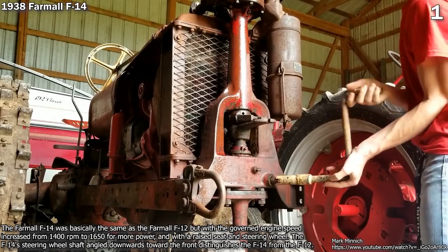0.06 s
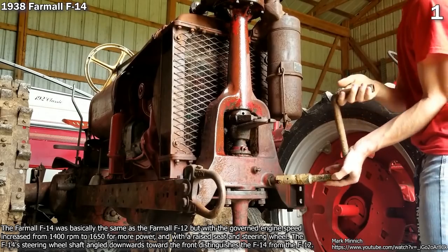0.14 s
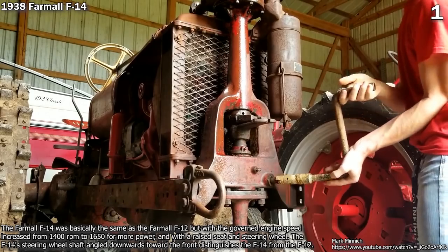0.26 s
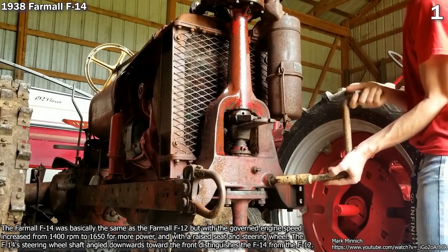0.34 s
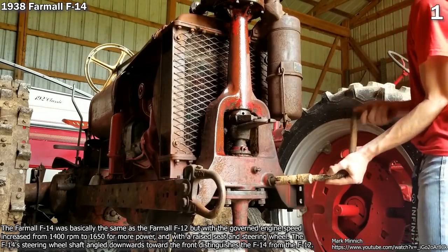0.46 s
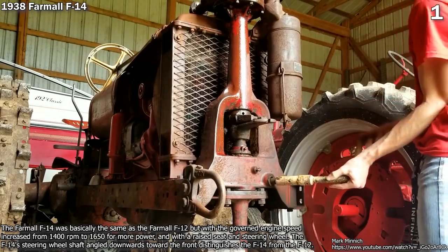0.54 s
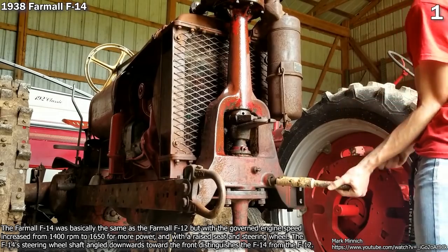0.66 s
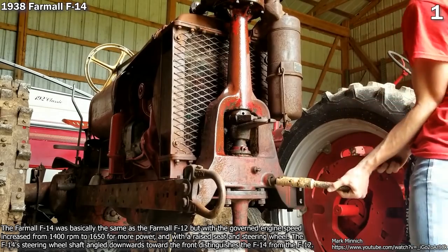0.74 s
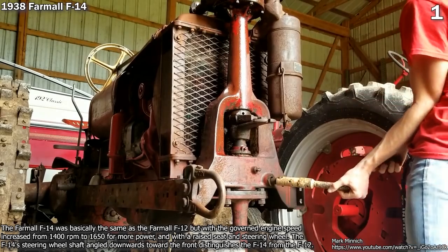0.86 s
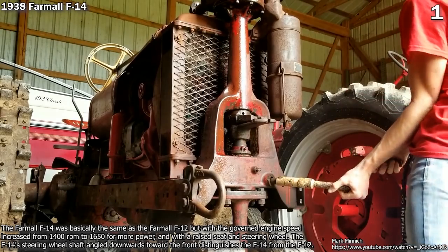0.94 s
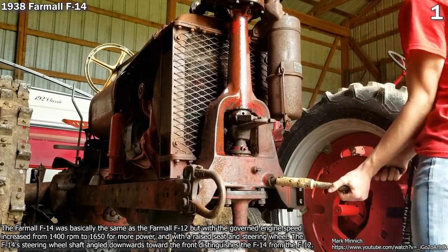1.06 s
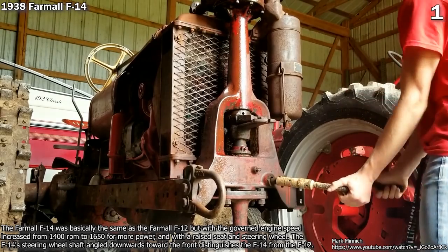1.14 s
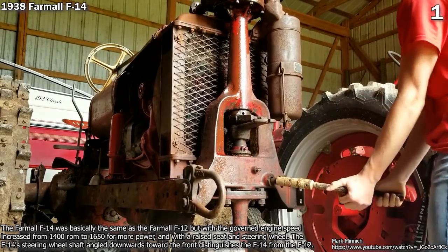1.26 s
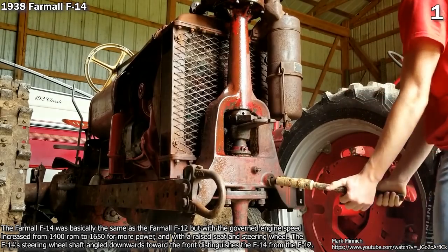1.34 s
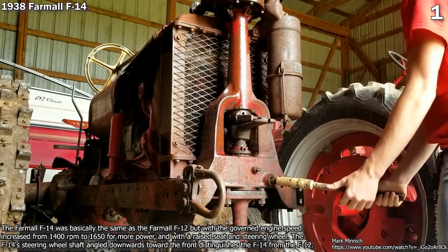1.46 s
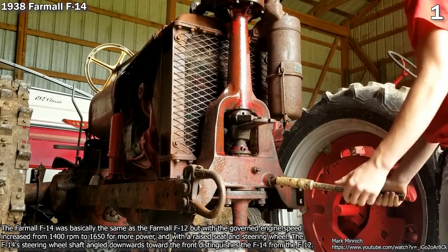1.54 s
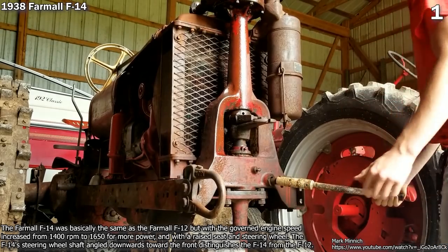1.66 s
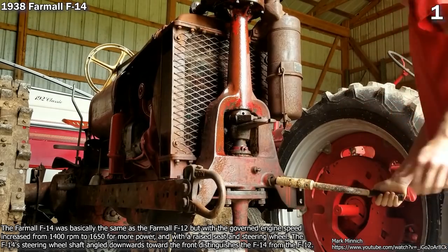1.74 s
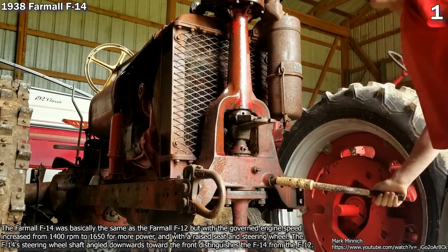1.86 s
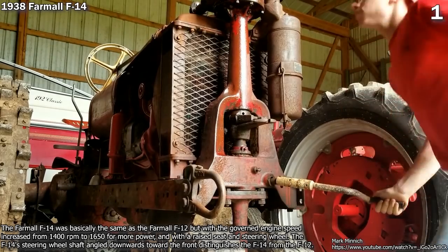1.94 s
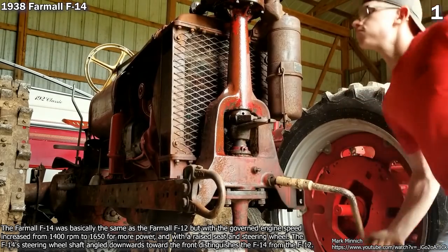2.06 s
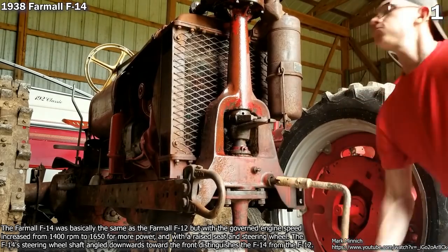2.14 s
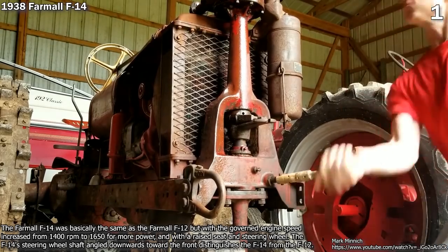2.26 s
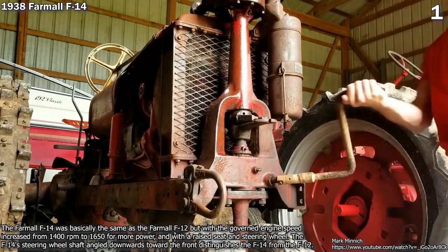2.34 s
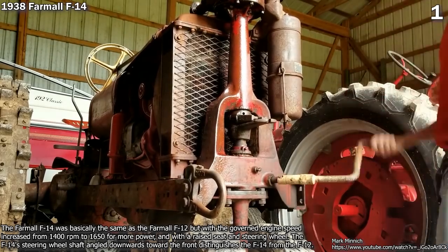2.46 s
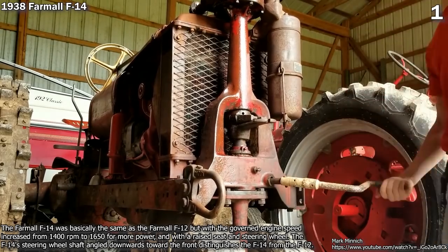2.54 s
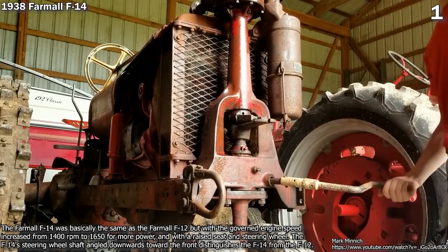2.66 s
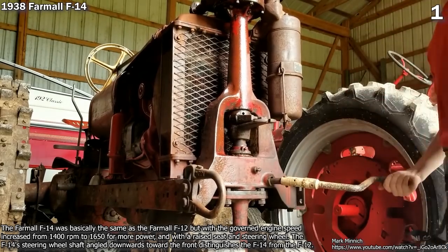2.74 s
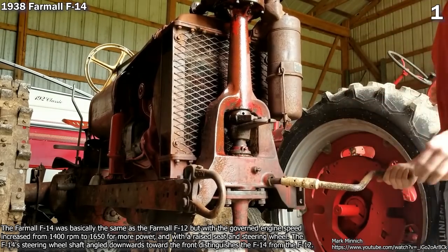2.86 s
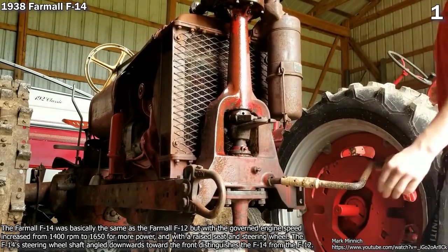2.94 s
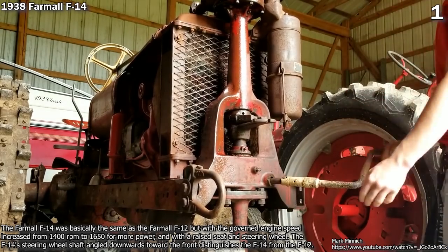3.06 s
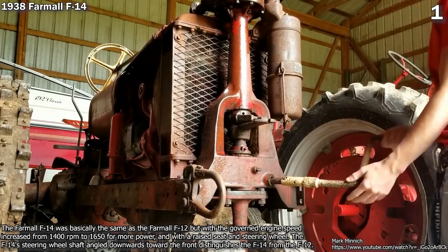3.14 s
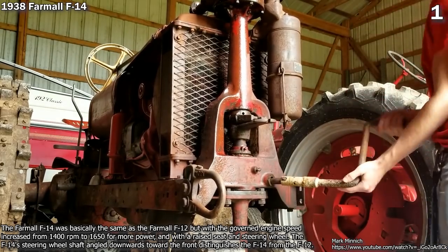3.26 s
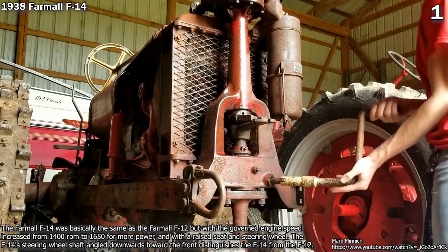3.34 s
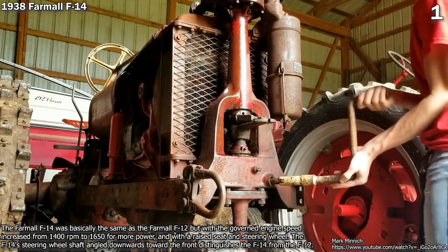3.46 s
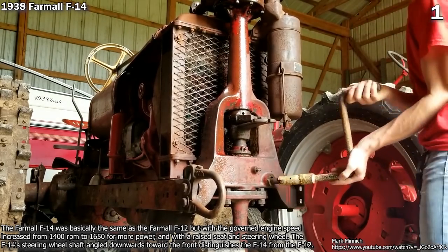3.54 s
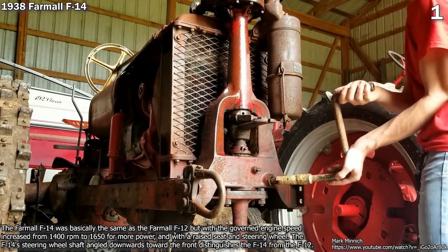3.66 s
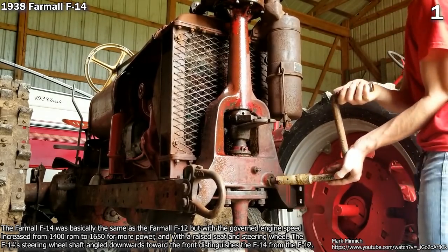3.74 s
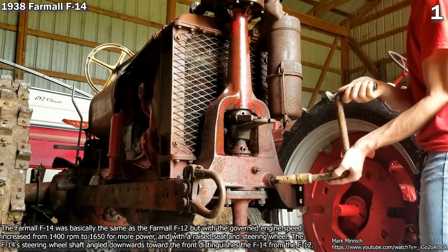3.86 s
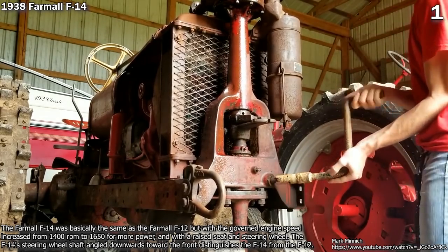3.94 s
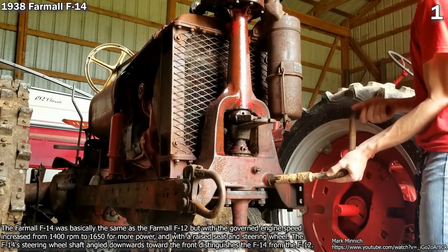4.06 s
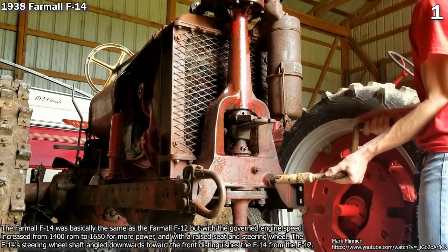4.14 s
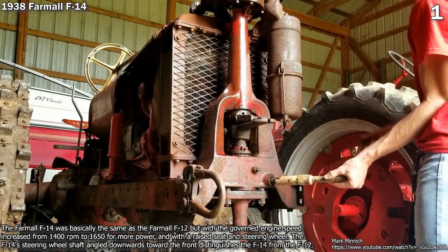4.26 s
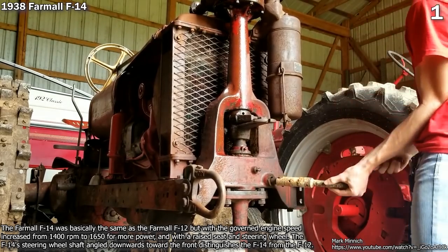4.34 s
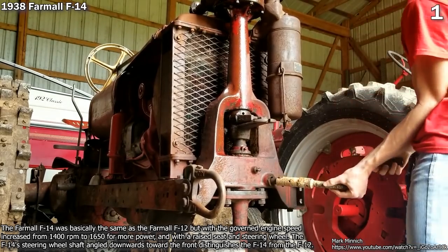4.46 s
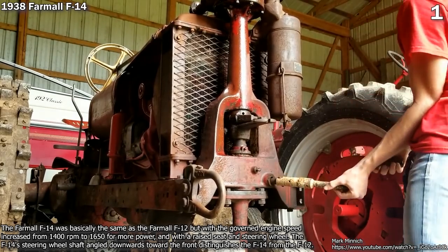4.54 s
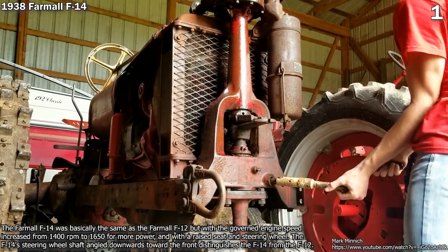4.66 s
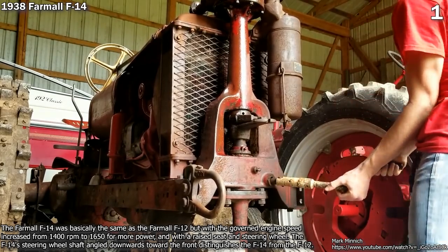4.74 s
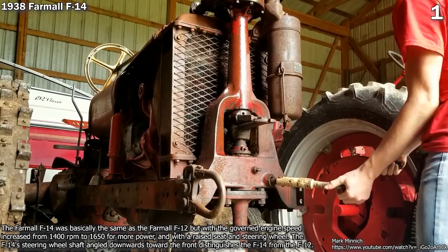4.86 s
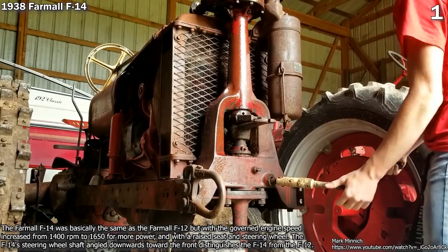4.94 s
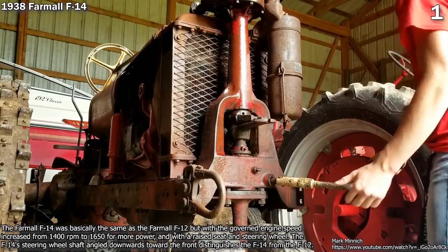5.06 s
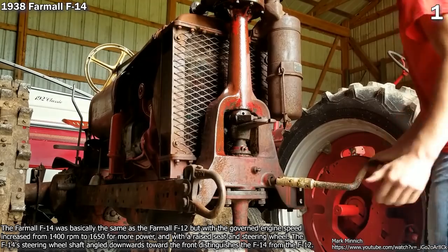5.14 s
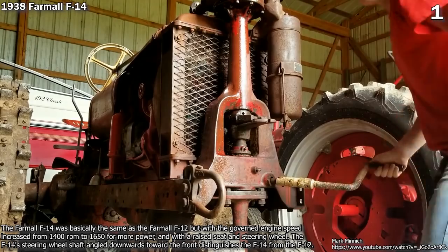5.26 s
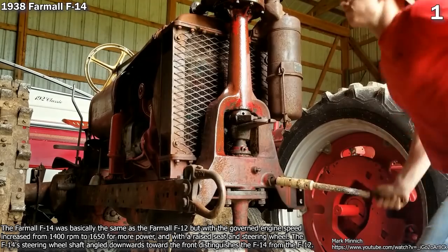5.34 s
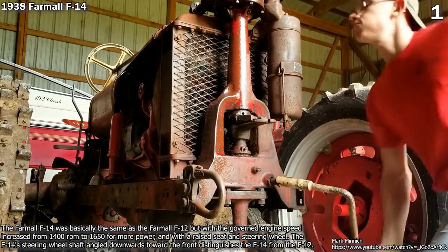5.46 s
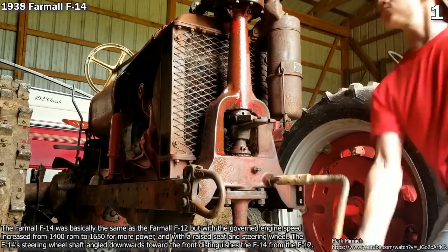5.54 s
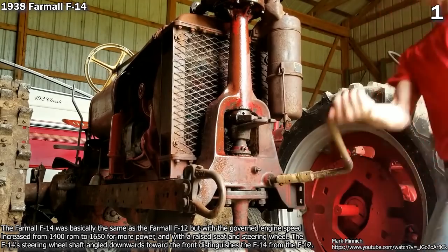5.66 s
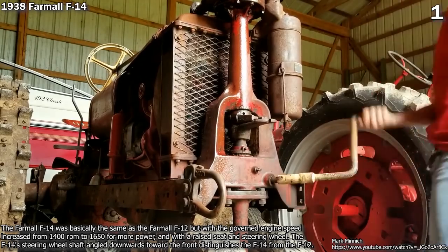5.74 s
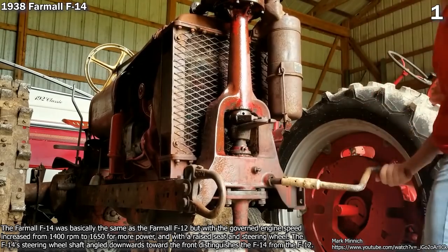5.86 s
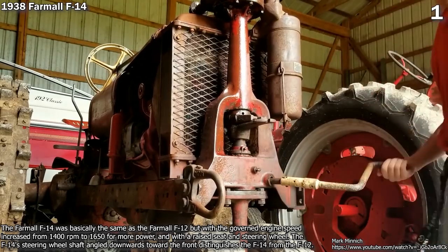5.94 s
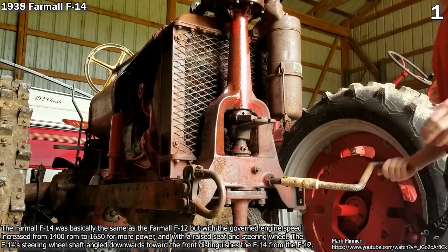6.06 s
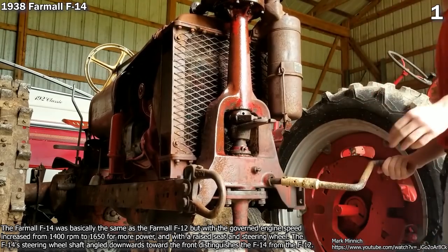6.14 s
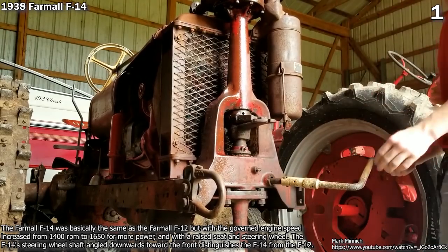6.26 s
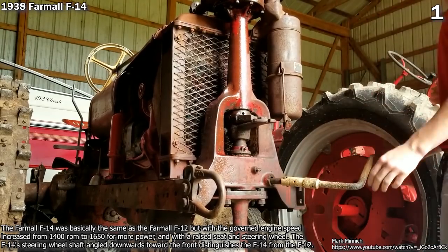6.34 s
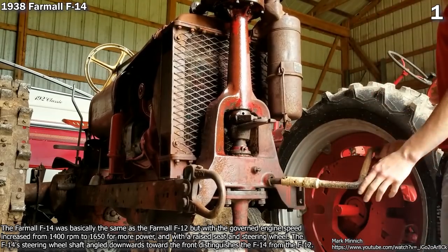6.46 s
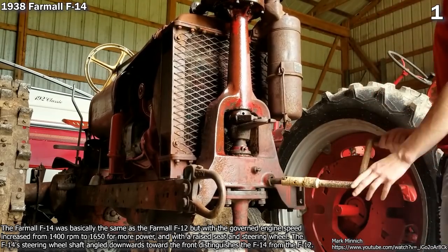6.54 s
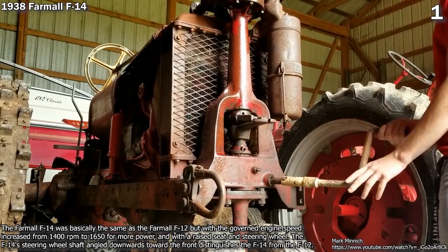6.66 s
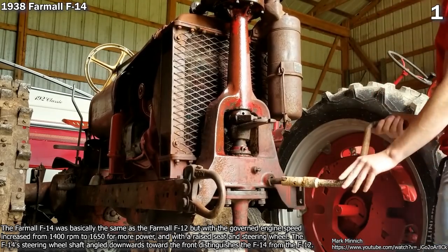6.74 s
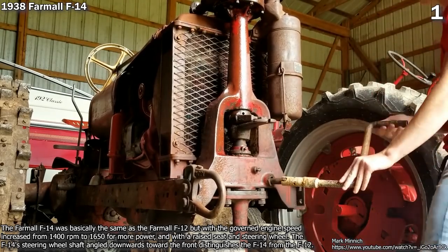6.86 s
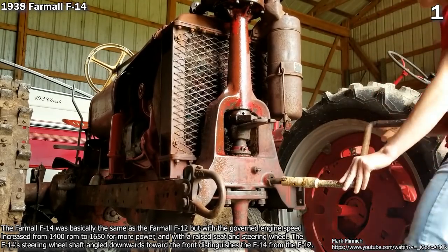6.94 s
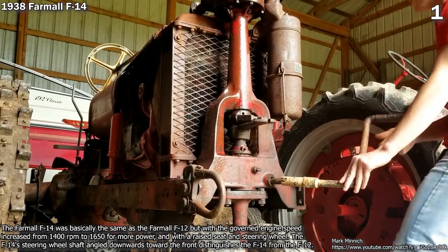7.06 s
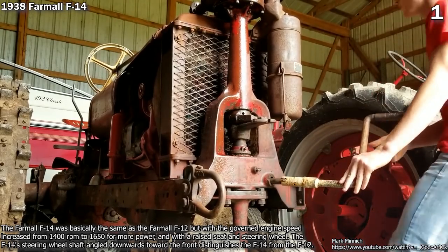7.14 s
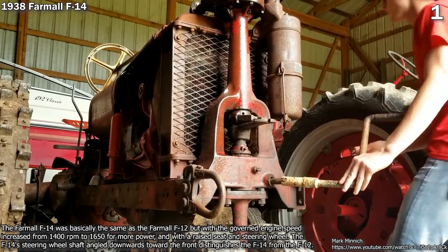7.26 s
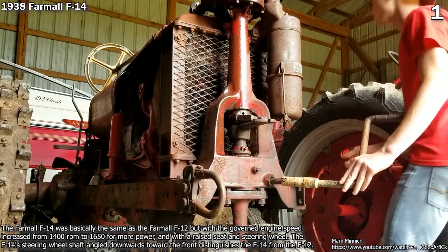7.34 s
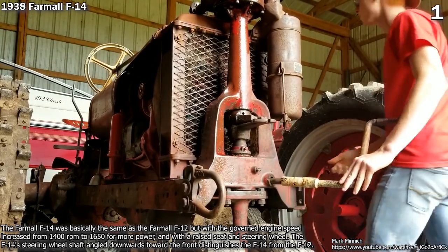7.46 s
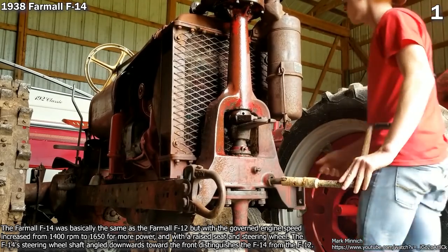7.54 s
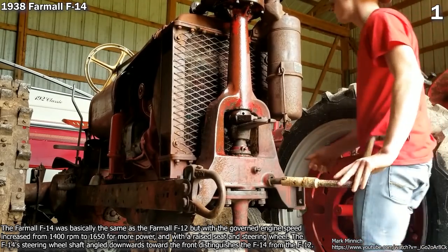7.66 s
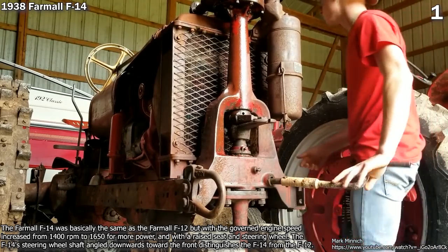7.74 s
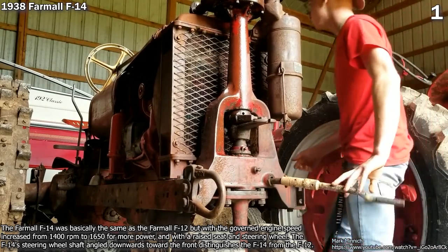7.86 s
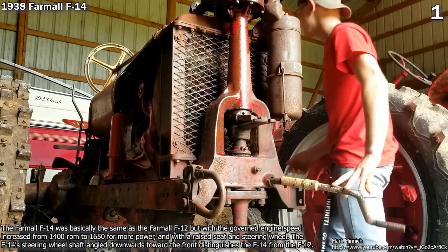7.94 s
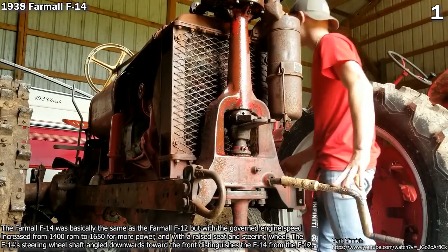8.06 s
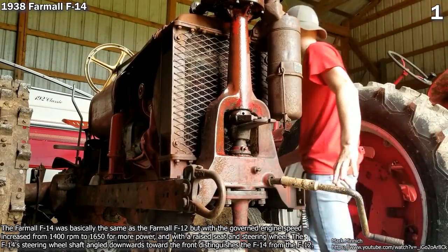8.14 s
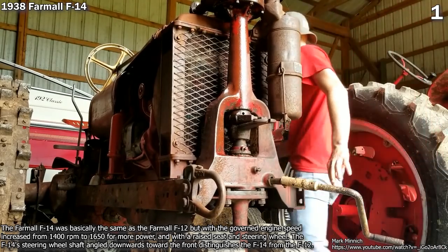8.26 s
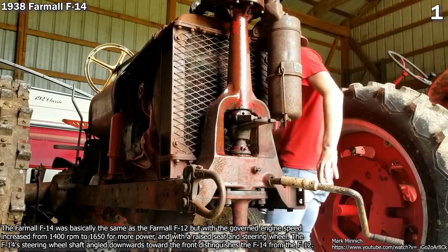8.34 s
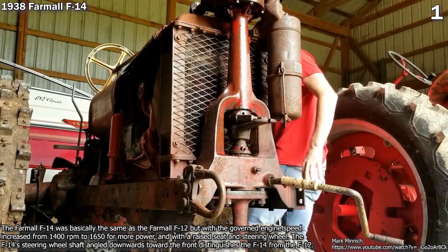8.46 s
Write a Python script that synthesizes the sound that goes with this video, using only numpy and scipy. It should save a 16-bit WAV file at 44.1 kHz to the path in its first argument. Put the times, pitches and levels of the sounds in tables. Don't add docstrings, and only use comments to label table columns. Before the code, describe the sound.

Inside a metal barn, an old iron engine is hand-cranked in two bursts of loud clacks and grinding gears, with soft handle knocks between.

```python
import sys
import numpy as np
from scipy import signal
from scipy.fft import rfft, irfft, next_fast_len
from scipy.io import wavfile
from scipy.ndimage import uniform_filter1d, map_coordinates

SR = 44100
rng = np.random.default_rng(int(sys.argv[2]) if len(sys.argv) > 2 else 0)


def invert_db(x):
    u = np.asarray(x, float) / 20
    return 10 ** u


def log_audio(samples):
    frames = np.atleast_2d(samples).T
    limited = np.clip(frames, -1, 1)
    pcm = np.round(limited * 32767).astype(np.int16)
    wavfile.write(sys.argv[1], SR, pcm)


N = 374844
SPAN, BINS = 49152, 18000


def unit(x):
    return x / np.sqrt(np.mean(x ** 2) + 1e-20)


def along(points, hz):
    f, v = np.transpose(points)
    return np.interp(np.log(hz + 1), np.log(f + 1), v)


def curves(rows):
    s, *cols = np.transpose(rows)
    return [np.interp(np.arange(N) / SR, s, c) for c in cols]


def wobble(rate):
    knots = rng.standard_normal(int(N * rate / SR) + 4)
    return map_coordinates(knots, [np.arange(N) * rate / SR])


def filtered(x, response):
    m = next_fast_len(N + SR)
    return irfft(rfft(x, m) * response(np.fft.rfftfreq(m, 1 / SR)), m)[..., :N]


def kind(events, shape):
    return [(*row, *shape) for row in events]


# (frequency [Hz], left-right likeness [1])
LIKENESS = [(30, 0.27), (120, 0.91), (300, 0.8), (1000, 0.14), (4000, 0.03)]
# (frequency [Hz], left over right [dB])
LEFT_LEAN = [(60, -3), (180, 4), (550, 5), (1650, 6.5), (4970, 3), (15000, 8)]


def rush(spectrum):
    m = next_fast_len(N)
    hz = np.fft.rfftfreq(m, 1 / SR)
    turn = np.arccos(np.clip(along(LIKENESS, hz), -1, 1)) / 2
    noise = rfft(rng.standard_normal((2, N)), m)
    mid, side = noise * invert_db(along(spectrum, hz)) * [np.cos(turn), np.sin(turn)]
    lean = invert_db(along(LEFT_LEAN, hz) * np.array([[.5], [-.5]]))
    pair = irfft(np.array([mid + side, mid - side]) * lean, m)[:, :N]
    return pair / np.sqrt(np.mean(np.mean(pair, axis=0) ** 2))


def peak(f, hz, width):
    return 1j * f * width / (hz * hz - f * f + 1j * f * width)


# (frequency [Hz], t60 [s])
BARN_T60 = [(200, 2), (700, 1.264), (3000, 0.86), (8000, 0.64), (14000, 0.42)]


def barn(early_db, early_t60):
    hz, t, z = signal.stft(rng.standard_normal((2, SR)), SR, nperseg=256)
    late = invert_db(-60 * t / along(BARN_T60, hz)[:, None])
    early = invert_db(early_db - 60 * t / early_t60)
    turn = np.arccos(np.clip(along(LIKENESS, hz), -1, 1))[:, None] / 2
    pair = np.cos(turn) * z[0] + np.sin(turn) * np.array([z[1], -z[1]])
    build_up = np.clip(t / 0.0021, 0, 1)
    tail = signal.istft(pair * (late + early) * build_up, SR, nperseg=256)[1]
    return rfft(tail / np.linalg.norm(tail[0]), SPAN)[:, :BINS]


def iron(events, parts, bands, halls, ring_db, trims_db, rough_db, rise, dip, wettest_db=5):
    f, t = np.fft.rfftfreq(SPAN, 1 / SR)[:BINS], np.arange(SR // 7) / SR
    modes = []
    for part in parts:
        modes.append(np.array([(-1) ** k * invert_db(db + ring_db) * peak(f, hz, width)
                               for k, (hz, width, db) in enumerate(part)]))
    beds = []
    for low, high in bands:
        middle, width = np.sqrt(low * high), high - low
        beds.append(peak(f, middle, width) ** 2 * peak(f, middle, 1.29 * width))
    hollow = (1 - np.clip(dip, 0, 1) * peak(f, 7800, 1700)) ** 2
    lean = invert_db(along(LEFT_LEAN, f) * np.array([[.5], [-.5]])) * hollow
    lag = np.exp(-2j * np.pi * f * np.array([[9e-5], [0]]))
    apart = 0.84 * f / (f + 500) * np.array([[1], [-1]])
    out = np.zeros((2, N + SPAN))
    for k, (s, db, boom_db, tick_db, contact, barn_db) in enumerate(events):
        onset = rise + .15 * contact
        decay = np.exp(-(t / np.clip(contact, .002, .09)) ** 1.4)
        push = np.clip(t / onset, 0, 1) ** 2 * decay
        chance = rng.standard_normal((3, len(t)))
        contacts = unit(invert_db(rough_db * unit(uniform_filter1d(chance[2], size=20))))
        shared, own = rfft(push * contacts * chance[:2], SPAN)[:, :BINS]
        whole = np.linalg.norm(push) * np.exp(-1j * np.pi * f * contact)
        levels = invert_db(db + np.array([boom_db, 0, tick_db]) + trims_db)
        bed = levels @ beds
        ring = sum(g * invert_db(rng.normal(0, 3, len(m))) @ m for g, m in zip(levels, modes))
        direct = (bed + ring) * (shared + apart * own) * lag
        hall_feed = (bed + 0.42 * ring) * (0.83 * whole + 0.49 * shared)
        far = invert_db(min(barn_db, wettest_db)) * hall_feed * halls[k % len(halls)]
        at = max(round((s - .7 * onset) * SR), 0)
        out[:, at:at + SPAN] += irfft(lean * (direct + far), SPAN)
    return out[:, :N]


# (frequency [Hz], density [dB per Hz])
AIR_SPECTRUM = [(120, -34), (200, -6), (227, -18), (382, -32), (3030, -24), (3380, -26), (5910, -31),
                (7330, -27), (14800, -27)]


def still_air():
    return invert_db(-72.0) * rush(AIR_SPECTRUM)


# (time [s], level [dB])
DRONE_LEVEL = [(0.0, -50), (0.59, -55.5), (1.23, -57), (2.0, -59), (2.22, -52), (2.56, -55), (2.74, -68.5),
               (2.95, -55.5), (3.41, -65), (3.72, -54.5), (4.02, -60), (4.69, -57.5), (5.1, -59.5),
               (5.66, -48), (6.25, -61.5), (7.05, -64.5), (8.24, -54), (8.5, -56)]
# (frequency [Hz], density [dB per Hz])
RUMBLE_SPECTRUM = [(13, -54.5), (22, -11), (59, -10.5), (86, -3), (122, -5), (173, -13.5), (236, -16),
                   (320, -32.5), (420, -62), (700, -120)]


def drone():
    turn = 2 * np.pi * np.cumsum(33.5 * (1 + 0.082 * wobble(0.99))) / SR
    second = invert_db(2.7 * wobble(6.2)) * np.sin(2 * turn)
    third = invert_db(-5.5 + 3.2 * wobble(9)) * np.sin(3 * turn)
    near_db, = curves([(0, 1), (1.5, 7.5), (3, -5), (8.5, -1.5)])
    rumble = rush(RUMBLE_SPECTRUM) * invert_db(0.61 * wobble(3.1))
    return invert_db(curves(DRONE_LEVEL)[0] - 2.0) * (rumble + invert_db(near_db) * (second + third))


# (time [s], peak [dB], casting boom [dB], bright tick [dB])
HANDLE_KNOCKS = [(.004, -49, 15, -9), (0.0242, -41, 9, -34), (0.054, -40, 2, -27), (0.1374, -33, 3, -2.5),
                 (3.191, -32, -2, -16), (3.267, -37, -3, -23), (3.3361, -52, 10.5, 10),
                 (4.389, -38, -1.5, -36), (6.561, -35, 6.5, -12), (7.0294, -55, 7, -15),
                 (7.2776, -48.5, 4, -4), (7.9413, -56.5, 10, 4.5), (8.329, -34, -3.5, -15)]
HIDDEN_KNOCKS = [(0.124, -47.5, 14, -14), (0.3192, -40, 5.5, -11), (0.3844, -70, 21, -13),
                 (1.1074, -50.5, 10.5, -30), (1.1482, -55.5, 19, -25), (1.1822, -42, -6.5, -11.5),
                 (3.3648, -42, 7, -30), (3.3877, -38, -9, -15), (3.4292, -46, 16.5, -8),
                 (4.0976, -36.5, -7, -8.5), (4.1814, -38, -7.5, -6), (4.7616, -50, -1, -6),
                 (6.3854, -30.5, -32.5, -3), (6.8714, -49, 3, -7), (6.9094, -50.5, 2.5, -7),
                 (7.006, -45.5, 1, -15), (7.3107, -50.5, 13.5, -10), (7.4694, -47.5, -6, -3.5),
                 (7.9089, -48, 12, -0.5), (8.1744, -55, 13, 4), (8.2074, -43, 0, -6),
                 (8.2394, -49.5, 8.5, -20)]
SOCKET_RATTLES = [(0.64, -58.5, 10.5, -11), (0.7045, -50.5, 12.5, -38), (1.14, -54, -2, -28),
                  (1.3535, -63, 18, 1), (3.3877, -34, 1.5, -22), (3.425, -41, 0, -10),
                  (4.44, -51, 5.5, -5.5), (6.5273, -34, 0, -3.5), (7.372, -55, 10, 3),
                  (7.395, -56.5, 4, 10.5), (8.355, -47, 1, -20), (0.345, -52.5, 18, -24),
                  (4.81, -62, 12, 3), (4.87, -66, 0, 10.5), (8.0514, -64, 24.5, 4)]
# (frequency [Hz], width [Hz], level [dB])
HANDLE_MODES = [
    [(404, 19, 2), (463, 24, 7), (636, 190, -0.5), (745, 8.9, -9), (882, 28, 3), (1292, 60, -2.5)],
    [(1890, 72, 4), (2150, 437, 5), (2420, 34, -29), (2520, 35, -35), (2820, 73, -14)],
    [(4300, 53, -7), (5100, 71, -47), (6240, 150, -39), (7660, 72, 19), (13140, 330, -2.5)],
]
# (low [Hz], high [Hz])
HANDLE_DENSE = [(250, 1090), (1600, 2700), (3500, 15600)]


def handle_knocks(halls):
    knocks = kind(HANDLE_KNOCKS, (.012, 1)) + kind(HIDDEN_KNOCKS, (.0095, 11.25))
    rattles = kind(SOCKET_RATTLES, (.022, 2.9))
    return iron(knocks + rattles, HANDLE_MODES, HANDLE_DENSE, halls, ring_db=2.0,
                trims_db=np.array([5, 3, -1]), rough_db=4, rise=0.0038, dip=0.51, wettest_db=14)


CLACK, SNAP, CLICK = (.012, 0.09), (0.012, -5.5), (0.003, -4.5)
# (time [s], peak [dB], casting boom [dB], bright tick [dB])
DOG_CLACKS = [(2.0685, -38.5, 20, -34), (2.2757, -3, -9, -9.5), (2.2979, -6.5, -10, -16),
              (2.5285, -3, -3, -11.5), (2.6107, -5.5, -6.5, -5.5), (2.8511, -2, -6, -14),
              (3.741, -32.5, 13, -4), (5.3981, -39.5, 3, -14.5), (5.4054, -38.5, 8, -10.5),
              (5.5039, -4, -8, -7.5), (5.6462, 1, -6.5, -12.5), (5.8628, -2, -4.5, -15.5)]
DOG_REBOUNDS = [
    (2.15, -20, -3, -11.5),
    (2.289, -6.5, -5, -11.5),
    (2.541, -7, -6, -12.5),
    (2.625, -11.5, -8.5, -11),
    (2.866, -23.5, -0.5, -10),
    (5.516, -17.5, -1, -9),
    (5.876, -9.5, -3.5, -10.5),
    (5.942, -8, -4.5, -9),
    (6.084, -15, -7.5, -11.5),
    (6.224, -21, -8, -5),
]
DOG_DRAGS = [
    (2.319, -14.5, -6, -10.5),
    (5.6664, -14, -3, -25.5),
    (5.695, -13.5, -6, -16),
    (6.2105, -14.5, -6.5, -21),
]
CLIMB_TICKS = [
    (2.0508, -42, -2.5, -9),
    (2.118, -26.5, -7, -11),
    (2.2514, -38, -4.5, -7),
    (5.4746, -31, -6, -11),
    (5.4921, -23, -12.5, 0.5),
    (5.6138, -18, -9.5, -9),
]
# (time [s], peak [dB])
STEEL_SPARKS = [
    (.008, -45),
    (0.138, -23),
    (.61, -46),
    (0.752, -41),
    (.797, -40),
    (5.426, -38),
    (5.44, -39),
]
# (frequency [Hz], width [Hz], level [dB])
CASE_MODES = [(520, 9.9, -10), (649, 21, 5.5), (760, 71, 1), (850, 44, 2), (957, 27, -2.5),
              (1237, 120, 3.5), (1485, 21, -7)]
COVER_MODES = [(1920, 39, 5), (2115, 34, 1), (2330, 42, 0), (3300, 12, -21), (3000, 120, -6.5),
               (4130, 53, -14.5), (5000, 24, -8.5), (6020, 210, -2), (5884, 170, 3.5), (6970, 13, 0),
               (7100, 26, -8.5), (7660, 27, -31), (7930, 48, -4)]
STEEL_MODES = [(10700, 160, -10), (11800, 150, -10), (12630, 40, 4), (13900, 50, -6)]
# (low [Hz], high [Hz])
ENGINE_DENSE = [(370, 1430), (1250, 9960), (9800, 13000)]


def dog_clacks(halls):
    body_db = -20.5
    sparks = [(s, db + body_db, -9, -body_db) for s, db in STEEL_SPARKS]
    events = kind(DOG_CLACKS, CLACK) + kind(DOG_REBOUNDS, SNAP) + kind(sparks, CLICK)
    events += kind(DOG_DRAGS, (0.024, -1.5)) + kind(CLIMB_TICKS, CLICK)
    return iron(events, (CASE_MODES, COVER_MODES, STEEL_MODES), ENGINE_DENSE, halls, ring_db=-5.5,
                trims_db=np.array([3.5, -4, 2.1]), rough_db=3.5, rise=0.0042, dip=0.034)


# (time [s], peak [dB], bright tick [dB])
SLEEVE_CLICKS = [
    (0.1186, -31, -4),
    (3.408, -40, -16),
    (3.4894, -42, -8),
    (6.7774, -41, -1),
    (6.874, -60, 15),
    (6.909, -46.5, 13.5),
    (7.032, -46, -10),
    (7.9418, -56, 19),
    (8.2144, -54, -5),
    (8.2367, -39, -4),
]


def sleeve_clicks(halls):
    sleeve = [(s, db, -27, tick_db, *CLICK) for s, db, tick_db in SLEEVE_CLICKS]
    return iron(sleeve, HANDLE_MODES, HANDLE_DENSE, halls, ring_db=2.5,
                trims_db=np.array([.1, 3, .1]), rough_db=4, rise=0.0018, dip=0.72)


# (time [s], level [dB], frequency [Hz], t60 [s])
HANDLE_NOTES = [(7.909, -47.5, 1130, 0.082), (7.912, -46.5, 703, 0.31), (7.942, -50, 3150, 0.039),
                (7.97, -53, 1107, 0.14), (8.051, -56, 1040, .1), (8.054, -49, 664, 0.16),
                (8.205, -54, 920, .2), (8.207, -43, 440, 0.092), (8.236, -45.5, 960, .2),
                (8.245, -50, 1243, .3), (8.33, -40, 940, 0.096), (8.352, -47, 920, 0.14),
                (8.356, -49, 1160, 0.19), (8.26, -57, 2670, 0.24), (4.39, -44.5, 652, 0.14),
                (4.44, -48.5, 628, 0.23), (.325, -45, 2187, 0.076), (.706, -46, 2030, 0.059),
                (3.69, -40, 490, 0.13), (3.668, -39, 1705, 0.27), (3.69, -41, 1687, .3),
                (3.715, -44, 1733, 0.17), (.137, -40, 2056, 0.093), (.15, -44, 753, 0.42),
                (3.74, -57, 990, 0.089), (3.75, -35.5, 434, 0.08), (3.81, -43.5, 527, 0.63),
                (7.006, -55.5, 2080, 0.064), (7.03, -51, 4050, 0.038),
                (.322, -48.5, 1283, 0.6), (.33, -48.5, 392, .3), (.335, -44.5, 826, .3),
               (.706, -47.5, 752, 0.24), (.71, -48, 377, 0.17), (1.141, -49, 2130, 0.065),
               (1.145, -50, 707, .2), (1.16, -55, 477, .3), (1.184, -48, 2176, 0.086),
               (1.355, -58, 1280, .12), (3.191, -43, 2185, 0.072), (3.197, -48, 1294, .1),
               (3.268, -42, 1240, 0.1), (3.387, -36.5, 2177, .1), (3.41, -44, 648, 0.36),
               (3.43, -46, 1268, .25), (3.47, -44, 492, .15), (6.529, -38, 2124, 0.07),
               (6.529, -39, 1520, 0.09), (6.53, -41, 2500, .1), (6.55, -45.5, 1203, 0.28),
               (6.545, -43.5, 825, 0.21), (7.031, -57, 1250, 0.13), (6.94, -56, 1250, 0.14),
               (7.311, -53, 2200, 0.085), (7.33, -50, 725, 0.37)]
# (time [s], level [dB], frequency [Hz])
FAVOURED_MODES = [(2.128, -25.5, 4080), (2.278, -18.5, 693), (2.531, -21.5, 751), (2.613, -22, 3790),
                  (2.853, -21.5, 2094), (5.507, -22.5, 898), (5.648, -19, 657), (5.649, -18.5, 1830),
                  (5.66, -19.5, 983), (5.748, -23.5, 3410), (5.864, -18, 718), (5.872, -19, 1247),
                  (5.875, -22, 2006), (6.072, -19.5, 690), (6.072, -21.5, 3030)]


def notes(hall):
    out, t = np.zeros((2, N + SPAN)), np.arange(SR // 2) / SR
    paths = invert_db([[2], [-2]]) + invert_db(-6) * hall
    for s, db, hz, t60 in HANDLE_NOTES + kind(FAVOURED_MODES, [0.087]):
        fade = invert_db(db - 60 * t / t60) * np.clip(t / 0.0037, 0, 1)
        twins = np.sin(2 * np.pi * hz * t) + 0.42 * np.sin(2 * np.pi * 1.04 * hz * t)
        out[:, round(s * SR):][:, :SPAN] += irfft(rfft(fade * twins, SPAN)[:BINS] * paths, SPAN)
    return out[:, :N]


# (time [s], level [dB], hold [s])
STROKES = [(.19, -61.5, 0.54), (1.267, -64.5, 0.076), (3.064, -49, 0.04), (3.27, -53.5, 0.061),
           (3.681, -35, 0.016), (4.144, -57, 0.27), (4.752, -74.5, 0.7), (6.276, -47, 0.0091),
           (6.498, -55.5, 0.25), (7.448, -58.5, 0.23), (8.168, -53.5, 0.24)]
# (frequency [Hz], density [dB per Hz])
CLOTH_SPECTRUM = [(240, -58), (400, -6.5), (494, 0), (732, 1), (1100, 2.5), (2410, -9.5), (7060, -13.5),
                  (9130, -23), (12500, -18.5), (14800, -20)]


def brushing():
    t = np.arange(N) / SR
    strokes = np.zeros(N)
    for s, db, hold in STROKES:
        rise_db = 470 * np.maximum(s - t, 0)
        fall_db = 100 * np.maximum(t - s - hold, 0)
        strokes += invert_db(db - rise_db - fall_db)
    return strokes * invert_db(-5.5 + 3.2 * wobble(26)) * rush(CLOTH_SPECTRUM)


# (time [s], level [dB])
GEAR_LOAD = [
    [(2.02, -71.5), (2.08, -39.5), (2.24, -33), (2.29, -25.5), (2.4, -33.5), (2.7, -36), (2.84, -51),
     (2.95, -43.5), (3.1, -46.5)],
    [(5.36, -80.5), (5.43, -39.5), (5.47, -42.5), (5.6, -33.5), (5.66, -25), (5.75, -34.5), (6.0, -31.5),
     (6.2, -37.5), (6.5, -55), (6.75, -78)],
]
# (frequency [Hz], density [dB per Hz])
GEAR_SPECTRUM = [(88, -51.5), (150, -7.5), (330, -8), (646, -2), (878, 0.5), (1340, -11), (1930, -7),
                 (4330, -12.5), (5890, -10.5), (8000, -12.5), (8640, -15.5), (12900, -19.5), (14800, -20)]
# (frequency [Hz], level [dB])
WHISTLE_TONES = [(12743, 0), (12606, -7)]
# (time [s], level [dB])
WHISTLE_PINGS = [
    (3.334, -54.5),
    (5.9, -37),
    (5.62, -35),
    (5.825, -36),
    (6.045, -46),
]


def gears():
    t = np.arange(N) / SR
    gear_db, = curves(GEAR_LOAD[0] + GEAR_LOAD[1])
    chatter = invert_db(gear_db + 2 * wobble(140) + .8 * wobble(25)) * rush(GEAR_SPECTRUM)
    whistle = np.zeros(N)
    for hz, db in WHISTLE_TONES:
        phase = 2 * np.pi * hz * t + 1.5 * wobble(25)
        whistle += invert_db(db + 3.1 * wobble(30)) * np.sin(phase)
    struck, fade = np.zeros(N + SR), invert_db(-60 * np.arange(SR) / SR / .5)
    blows = [(s, db + tick_db - 24) for s, db, _, tick_db in DOG_CLACKS + DOG_SNAPS + DOG_DRAGS]
    for s, db in blows + WHISTLE_PINGS:
        struck[round(s * SR):][:SR] += invert_db(db) * fade
    turning = np.interp(t, [1.9, 2, 3.1, 3.3, 5.3, 5.36, 6.75, 6.9], [0, 1, 1, 0, 0, 1, 1, 0])
    return turning * chatter + invert_db([[3], [-3]]) * struck[:N] * whistle


# (time [s], start pitch [Hz], end pitch [Hz], level [dB], t60 [s])
TYRE_BUMPS = [
    (3.575, 161, 196, -39, 0.57),
    (3.781, 230, 205, -42, 0.33),
    (2.06, 210, 320, -36.5, .3),
    (7, 400, 350, -67, 0.2),
    (5.39, 340, 440, -42.5, .3),
]


def tyre():
    out, t = np.zeros(N + SR), np.arange(SR // 2) / SR
    for s, start_hz, end_hz, db, t60 in TYRE_BUMPS:
        pitch = end_hz + (start_hz - end_hz) * np.exp(-t / 0.11)
        fade = invert_db(db - 60 * t / t60) * np.clip(t / 0.042, 0, 1)
        out[round(s * SR):][:len(t)] += fade * np.sin(2 * np.pi * np.cumsum(pitch) / SR)
    return out[:N]


# (time [s], peak [dB], casting boom [dB], bright tick [dB])
DOG_SNAPS = [
    (2.126, -7, -5.5, -10),
    (2.399, -2.5, -10.5, -13),
    (5.4351, -27, 4.5, -11),
    (5.7468, -1.5, -10.5, -11.5),
    (5.9283, -0.5, -9.5, -10.5),
    (6.0695, -2.5, -2, -14),
]
# (low [Hz], high [Hz])
SNAP_DENSE = [(370, 1730), (2500, 8050), (9800, 14000)]


def dog_snaps(halls):
    engine = (CASE_MODES, COVER_MODES, STEEL_MODES)
    return iron(kind(DOG_SNAPS, SNAP), engine, SNAP_DENSE, halls, ring_db=-5.5,
                trims_db=np.array([3.5, -3, 2.1]), rough_db=5.5, rise=0.0035, dip=0.026)


# (time [s], peak [dB], casting boom [dB])
SLIP_COURSE = [
    (3.6547, -35, -14),
    (3.6738, -21.5, -11),
    (3.684, -20, -13),
    (3.713, -24, -2),
    (3.741, -34, 2),
]
# (frequency [Hz], width [Hz], level [dB])
CLAW_MODES = [(1680, 90, 3), (2700, 300, 5), (3360, 400, 5), (4600, 500, 7), (5300, 300, 3), (7470, 400, 5)]
# (one band edge [Hz], other band edge [Hz])
CLAW_DENSE = [(370, 1300), (1500, 5800), (11200, 6000)]


def dog_slip(halls):
    s, db, boom_db = np.transpose(SLIP_COURSE)
    times = np.arange(s[0], s[-1] + .002, 1 / 106)
    ticks = [(u, np.interp(u, s, db), np.interp(u, s, boom_db), -35) for u in times]
    return iron(kind(ticks, (0.0035, 0.41)), (CASE_MODES, CLAW_MODES, STEEL_MODES), CLAW_DENSE, halls,
                ring_db=-1.0, trims_db=np.zeros(3), rough_db=4, rise=.0012, dip=0.038)


# (time [s], level [dB], pitch [Hz], hold [s])
CLEAR_CHEEPS = [(4.47, -69, 2890, 0.041), (4.539, -65.5, 3810, 0.06), (4.623, -72, 2750, 0.069),
                (4.802, -70, 2440, 0.074), (4.896, -68.5, 6320, 0.04), (5.05, -74, 1940, 0.097),
                (5.148, -75, 1227, 0.099), (5.022, -82.5, 1396, 0.14), (5.15, -81.5, 4000, .12),
                (5.266, -74.5, 2420, .05), (4.69, -75, 2480, 0.067), (5.172, -59, 2880, 0.08),
                (5.232, -65, 2780, 0.015), (5.259, -61.5, 2790, 0.015), (5.322, -63.5, 2833, 0.015),
                (7.863, -67, 7410, 0.013), (7.885, -77, 7970, .012)]
# (time [s], level [dB], start pitch [Hz], end pitch [Hz], hold [s])
HOARSE_CHIRPS = [
    (4.851, -64, 6030, 6100, 0.014),
    (7.074, -68.5, 2750, 2460, 0.3),
    (7.665, -67.5, 3140, 2800, 0.087),
    (7.78, -67.5, 2796, 2600, 0.3),
]


def birds():
    out, t = np.zeros((2, N + SR)), np.arange(SR) / SR
    f = np.fft.fftfreq(SR, 1 / SR)
    calls = [(s, db, hz, hz, hold, 60, .6) for s, db, hz, hold in CLEAR_CHEEPS]
    calls += kind(HOARSE_CHIRPS, (280, 0.76))
    for s, db, start_hz, end_hz, hold, spread_hz, t60 in calls:
        noise = np.fft.fft(rng.standard_normal((2, SR))) * np.exp(2j * np.pi * rng.random(SR))
        blur = np.fft.ifft(noise / (1 + 1j * f / spread_hz) ** 2)
        pitch = np.interp(t, [0, hold + 0.032], [start_hz, end_hz])
        tone = unit(np.real(blur * np.exp(2j * np.pi * np.cumsum(pitch) / SR)))
        flutter_db = 3.5 * np.sin(2 * np.pi * (24 * t + rng.random()))
        fall_db = 60 * np.clip(t - hold, 0, 1) / t60
        fade = invert_db(db + flutter_db - fall_db) * np.clip(t / 0.0071, 0, 1)
        out[:, round(s * SR):][:, :SR] += fade * tone
    return out[:, :N]


def scene():
    halls = [barn(early_db=-2.0, early_t60=0.34) for _ in range(5)]
    handle = handle_knocks(halls) + sleeve_clicks(halls) + notes(halls[1])
    engine = dog_clacks(halls) + gears() + dog_snaps(halls) + dog_slip(halls)
    return still_air() + drone() + handle + engine + brushing() + tyre() + birds()


# (frequency [Hz], level under the middle band [dB])
WEAKEST_KEPT = [(7900, -60), (8400, -12.5), (11300, -30), (12200, -24), (13300, -27), (15000, -25)]


def starve(x):
    hz, _, z = signal.stft(x, SR, nperseg=1024)
    power = uniform_filter1d(uniform_filter1d(np.abs(z) ** 2, size=9, axis=1), size=3, axis=2)
    power = np.abs(power)
    middle = power[:, (hz > 1000) & (hz < 7000)].mean(axis=1, keepdims=True)
    chance = uniform_filter1d(rng.standard_normal(z.shape[1:]), size=5, axis=0)
    fickle = unit(uniform_filter1d(chance, size=8, axis=1))
    past = uniform_filter1d(middle, size=110, axis=2, origin=54, mode='nearest')
    fall_db = np.clip(10 * np.log10(np.abs(past) / (middle + 1e-20) + 1e-20), 0, 24)
    raised_db = 0.48 * fall_db * (hz > 8200)[:, None]
    relative_db = 10 * np.log10((power + 1e-20) / (middle + 1e-20))
    margin_db = 7.5 * fickle - raised_db + relative_db - along(WEAKEST_KEPT, hz)[:, None]
    return signal.istft(z * np.clip(margin_db / 2 + .5, 0, 1), SR, nperseg=1024)[1][:, :N]


def low_pass(x):
    return signal.sosfilt(signal.butter(12, 15930, fs=SR, output="sos"), x)


def record(dry):
    held = dry / (1 + np.abs(dry / .9) ** 4) ** (1 / 4)

    def response(hz):
        treble_dip = invert_db(-6 * np.exp(-((hz - 9700) / 1500) ** 4))
        return treble_dip * (invert_db(-35) + 1 / (1 + (hz / 14650) ** 120))

    return low_pass(starve(filtered(held, response)))


dry = scene()
out = record(dry)
log_audio(out)
```